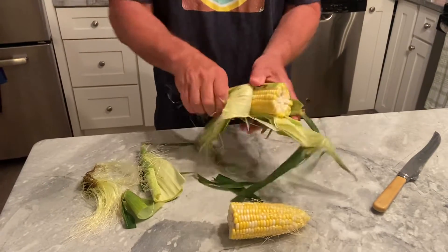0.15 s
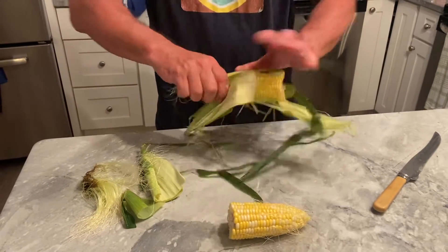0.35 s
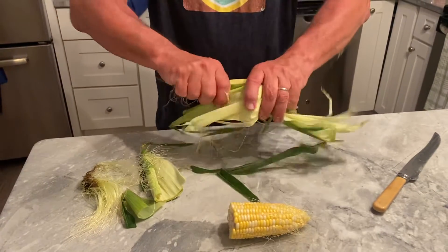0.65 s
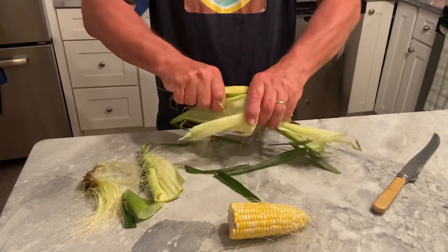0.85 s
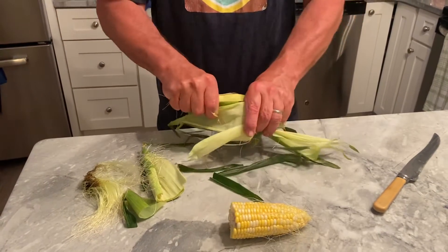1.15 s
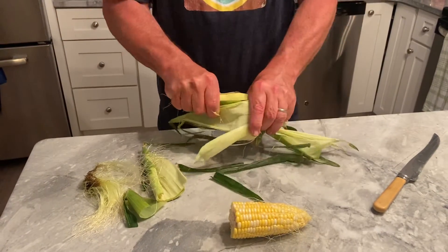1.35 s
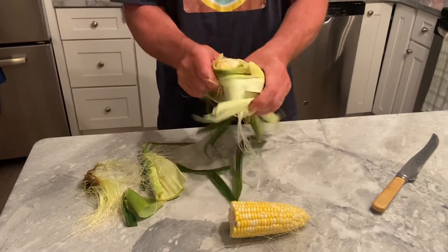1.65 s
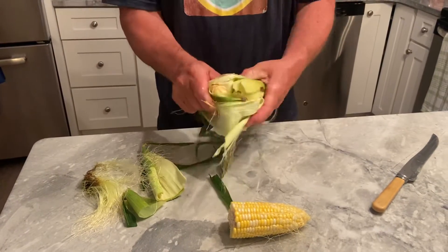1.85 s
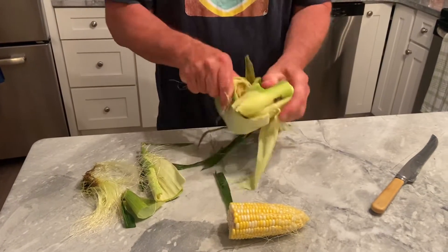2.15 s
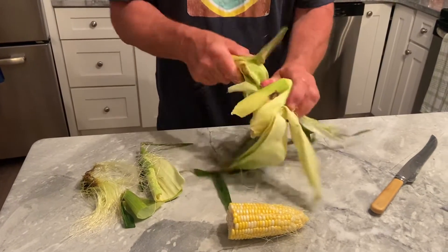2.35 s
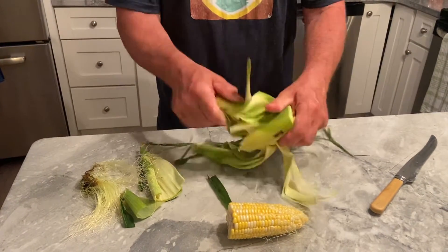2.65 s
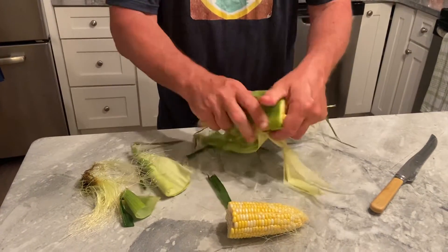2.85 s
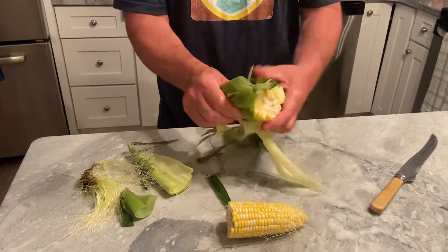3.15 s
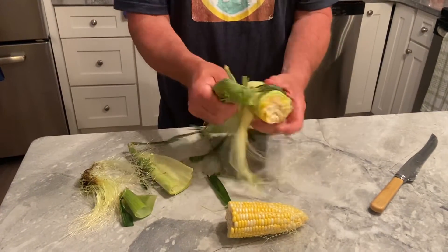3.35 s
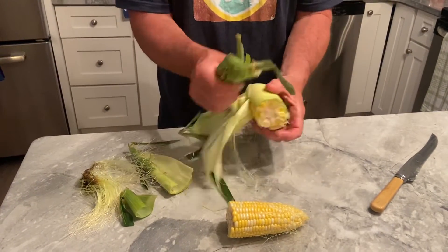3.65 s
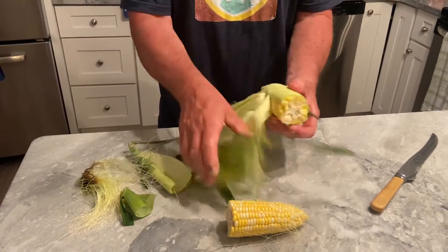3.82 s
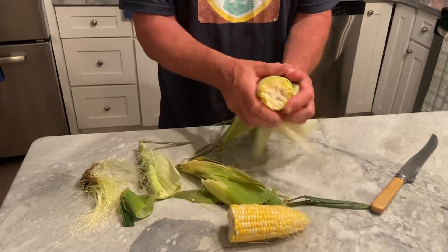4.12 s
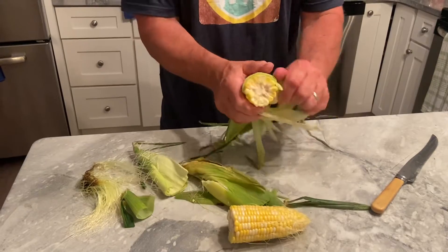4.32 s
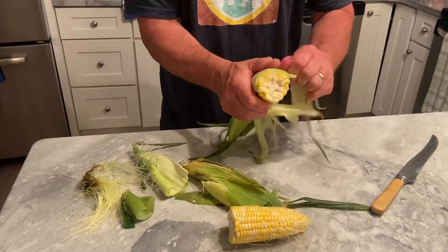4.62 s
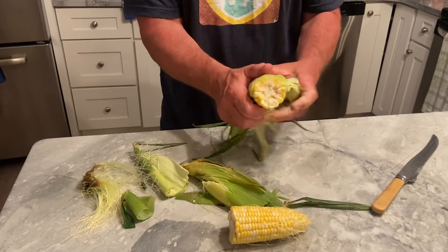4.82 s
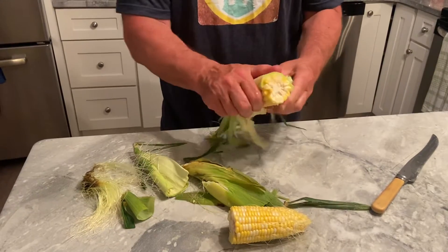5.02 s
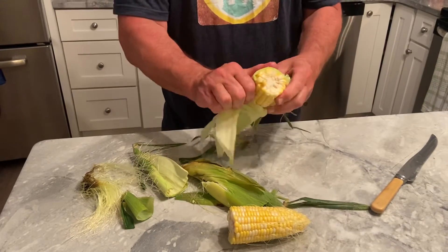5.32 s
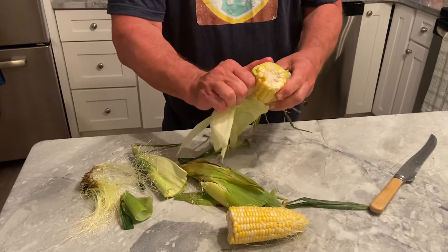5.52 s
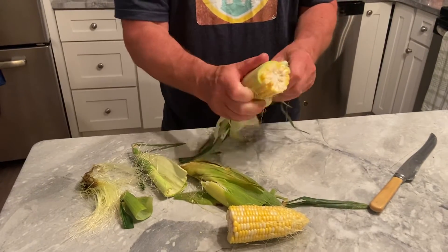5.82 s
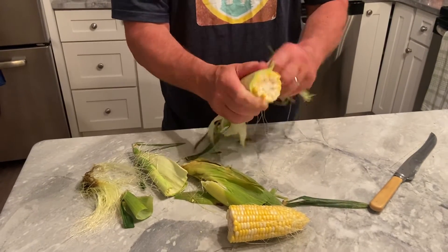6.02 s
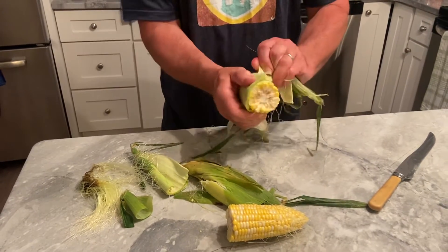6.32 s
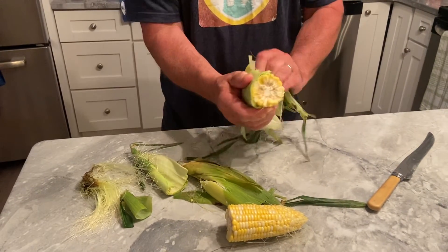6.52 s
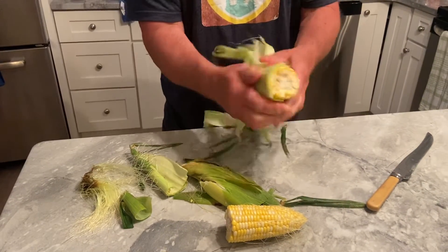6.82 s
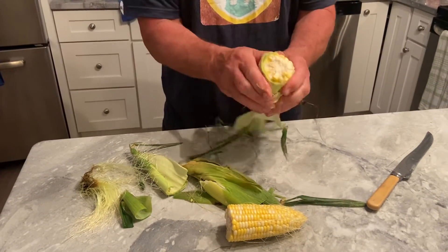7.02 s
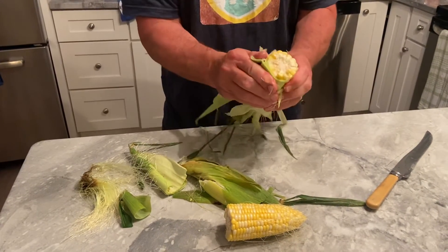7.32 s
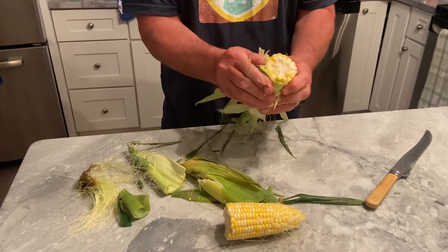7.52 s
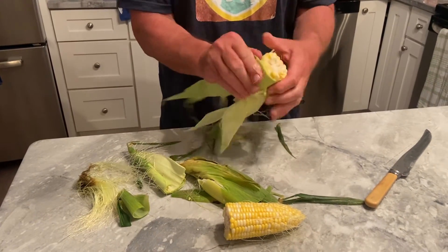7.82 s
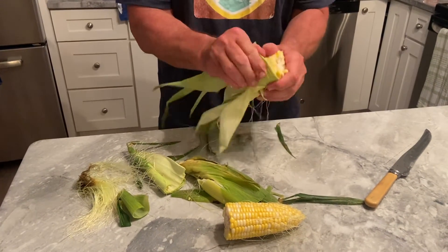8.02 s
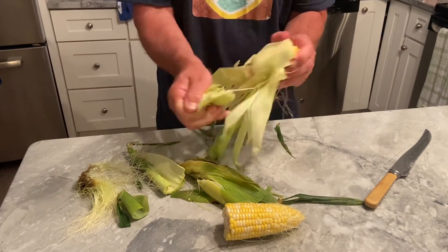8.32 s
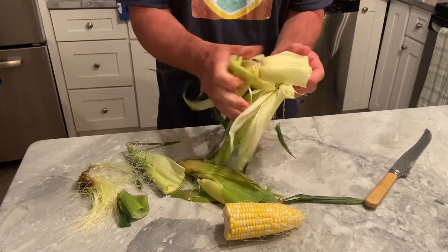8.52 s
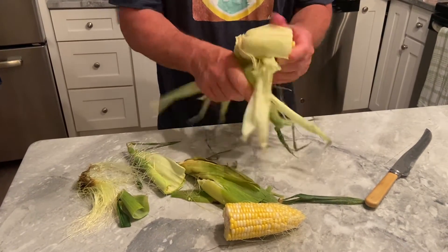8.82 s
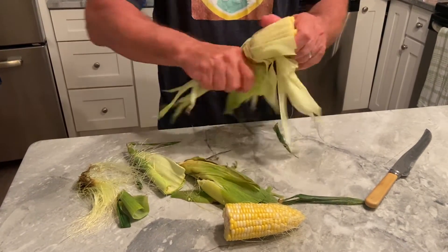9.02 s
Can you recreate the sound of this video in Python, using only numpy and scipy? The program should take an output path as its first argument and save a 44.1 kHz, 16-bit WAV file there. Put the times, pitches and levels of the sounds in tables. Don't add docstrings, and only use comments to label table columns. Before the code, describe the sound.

Close hands peel damp corn leaves: soft papery rubbing, sharp fibrous cracks, brief wet squeaks and small thuds over a faint refrigerator hum.

```python
import sys
import numpy as np
from scipy import signal
from scipy.fft import rfft, irfft, next_fast_len
from scipy.io import wavfile
from scipy.ndimage import uniform_filter1d

SR = 44100
rng = np.random.default_rng(int(sys.argv[2]) if len(sys.argv) > 2 else 0)


def file_out(sig):
    cols = np.atleast_2d(sig).T
    lim = np.clip(cols, -1, 1)
    pcm = np.round(lim * 32767).astype(np.int16)
    wavfile.write(sys.argv[1], SR, pcm)


def volts(x):
    e = np.asarray(x, float) / 20
    return 10 ** e


N = 403956


def evened(x):
    return x / np.sqrt(np.mean(x ** 2) + 1e-20)


def read(points, hz):
    f, value = np.transpose(points)
    return np.interp(np.log(hz + 1), np.log(f + 1), value)


def add(mix, start_s, sound):
    part = mix[round(start_s * SR):][:len(sound)]
    part += sound[:len(part)]


def resonate(x, hz, width_hz):
    turn = np.exp(2j * np.pi * hz * np.arange(len(x)) / SR)
    r = np.exp(-np.pi * width_hz / SR)
    return 2 * (turn * signal.lfilter([1 - r], [1, -r], x / turn)).real


def causal(x, db):
    log_gain = np.log(volts(np.maximum(db, -100)))
    whole = np.concatenate([log_gain, log_gain[-2:0:-1]])
    min_phase = np.exp(np.conj(signal.hilbert(whole))[:len(db)])
    return irfft(rfft(x) * min_phase, len(x))


# frequency in Hz, level in dB per Hz.
HUM_SPECTRUM = [(18, -38), (50, 2), (98, -12), (204, -3.5), (486, -13), (780, -21), (1250, -25.5),
                (2010, -35), (6400, -32.5), (11000, -38.5), (16000, -60)]
# frequency in Hz, correlation.
HUM_LIKENESS = [(60, 0.96), (130, 0.93), (290, 0.62), (640, 0.35), (1410, 0.077), (3100, 0.6), (6820, 0.23),
                (15000, 0.53)]
# frequency in Hz, width in Hz, level in dB.
MOTOR_LINES = [(145.5, 10, -54.5), (199, 14, -55.5), (294.3, 14, -61)]


def hum():
    air_db = -49
    frames, hz = N // 512 + 5, np.fft.rfftfreq(2048, 1 / SR)
    a, b, c, d = rng.standard_normal((frames, 1025, 4)).T
    same = np.clip(read(HUM_LIKENESS, hz), -1, 1)[:, None]
    left = a + 1j * b
    right = same * left + np.sqrt(1 - same ** 2) * (c + 1j * d)
    z = np.array([left, right]) * volts(read(HUM_SPECTRUM, hz))[:, None]
    air = evened(signal.istft(z, nperseg=2048, noverlap=1536)[1][:, :N])

    motor = np.zeros(N)
    for line_hz, width_hz, db in MOTOR_LINES:
        waver = evened(resonate(rng.standard_normal(N), line_hz, width_hz))
        tone = np.sin(2 * np.pi * line_hz * np.arange(N) / SR)
        motor += volts(db) * evened(waver + 1.5 * tone)
    return volts(air_db) * air + motor


def strokes(rows, swell_db):
    still_db = -80
    start, peak, end, db, sink_s, tilt = np.transpose(rows)[:, :, None]
    t = np.arange(0, N / SR + .002, .001)
    swell = swell_db * (t - peak) / np.maximum(peak - start, 1e-4)
    sink = 20 * (peak - t) / sink_s
    level_db = np.maximum(db + np.where(t < peak, swell, sink), still_db)
    each_db = np.where((t >= start) & (t <= end), level_db, still_db)
    return t, each_db.max(0), tilt[each_db.argmax(0), 0]


# frequency in Hz, level in dB.
LEAF_SPECTRUM = [(150, -55.5), (400, -6.5), (900, -6.5), (2000, -0.5), (4200, -1.3), (7000, -6.8),
                 (10000, -8), (13000, -17.5), (16000, -37)]


def crackle(s, level_db, tilt, per_s, spread_db, hiss, clump_db, body_db):
    sheet_hz, sheet_width_hz = 2700, 1100
    clumps = evened(uniform_filter1d(uniform_filter1d(rng.standard_normal(N), 500), 300))
    tick_level = volts(spread_db * np.minimum(rng.exponential(1, N), 6))
    ticks = tick_level * (rng.random(N) < per_s / SR)
    grains = evened(signal.lfilter([1], [1, -.9], ticks) * rng.standard_normal(N))
    drive = (grains + hiss * rng.standard_normal(N)) * volts(clump_db * clumps)

    hz, t, z = signal.stft(drive, SR, nperseg=256, noverlap=192)
    hz = hz[:, None]
    patches = rng.standard_normal(z.shape[::-1]).T
    patches = evened(uniform_filter1d(uniform_filter1d(patches, 5, 0), 9, 1))
    slope_db = np.log2(np.maximum(hz, 1100) / 3000) * np.interp(t, s, tilt)
    sheet_db = body_db / (1 + ((hz - sheet_hz) / sheet_width_hz) ** 2)
    z = z * volts(read(LEAF_SPECTRUM, hz) + slope_db + sheet_db + 2.8 * patches)
    leaves = evened(signal.istft(z, SR, nperseg=256, noverlap=192)[1][:N])
    return leaves * volts(np.interp(np.arange(N) / SR, s, level_db) - 2.5)


# start in seconds, level in dB,
# time to sink 20 dB in seconds, brightness in dB per octave.
GRIP_SHIFTS = [(0.0, -47, .45, -0.6), (.458, -45.5, .17, -1), (.57, -46, .13, 1), (.68, -54, .5, -2),
               (1.312, -60, .8, 0.5), (1.49, -32.5, .22, -2.5), (1.62, -46.5, .35, 3),
               (1.758, -42, .14, -4), (2.26, -35, .23, -1.5), (2.4, -48.5, .6, 0.6), (2.686, -45, .22, -1),
               (3.352, -38, .175, 0.3), (3.712, -45, .2, -1), (4.056, -50, .4, -1), (4.64, -48, .9, 0.7),
               (5.198, -50, .095, -3), (5.612, -59, .5, 4), (6.52, -52, .6, 2), (6.87, -54, .7, 1),
               (7.212, -54, .2, 5), (7.598, -52, .15, 5), (7.75, -61, .4, 2), (7.93, -62, .6, -1),
               (8.05, -53, .05, 1), (8.335, -37, .2, 0.3), (9.0, -55, 1.5, 2.5)]
# start in seconds, peak in seconds, level in dB,
# time to sink 20 dB in seconds, brightness in dB per octave.
LEAF_SLIDES = [(.24, .298, -46.5, .1, 3), (.9, 1.174, -50, .14, 3), (1.94, 1.99, -55, .1, 2.5),
               (2.11, 2.164, -44, .25, 2), (2.72, 3.014, -44.5, .16, 1), (3.264, 3.278, -42, .06, -4),
               (3.5, 3.66, -51.5, .02, 0.1), (3.72, 3.78, -43.5, .3, 3.5), (3.84, 3.922, -45, .09, -2),
               (4.06, 4.13, -46.5, .6, -1.5), (4.8, 5.008, -50, .33, -1), (5.29, 5.33, -50, .2, 2),
               (5.72, 5.745, -49.5, .09, 3), (5.78, 5.87, -51, .09, 0.6), (5.97, 6.1, -48, .06, 0.3),
               (6.66, 6.706, -49.5, .08, 1), (6.9, 7.152, -57.5, .11, 3), (7.21, 7.296, -55, .12, -1),
               (8.55, 8.662, -42, .24, 0.4), (8.875, 8.942, -43.5, .08, 0.3)]


def rustle():
    shift_s = .008
    rows = [(s - shift_s, s, np.inf, *rest) for s, *rest in GRIP_SHIFTS]
    rows += [(start, peak, np.inf, *rest) for start, peak, *rest in LEAF_SLIDES]
    return crackle(*strokes(rows, swell_db=11),
                   per_s=2800, spread_db=3.0, hiss=0.7, clump_db=1.6, body_db=-0.8)


# time in seconds, peak in dB, ring in Hz, brightness in dB per octave.
STRONG_FIBRES = [(1.1568, -28.5, 4340, 0.5), (1.4141, -.3, 4300, 0.4), (1.4165, -5, 1500, -2),
                 (1.4215, -11, 1400, -1), (1.4258, -9, 2200, -2), (1.4294, -10, 4300, 0.1),
                 (1.444, -14, 2100, -1), (1.4498, -11, 1400, -1), (1.46, -14, 2900, -1),
                 (1.467, -17, 3500, -1), (1.478, -16, 2000, -2), (2.0021, -23, 3600, -1),
                 (2.003, -28, 1800, -3), (2.0084, -26, 3400, 2), (2.0462, -22, 2000, 0.1),
                 (2.155, -22.5, 4300, 3), (2.26, -26, 5300, 4), (2.2838, -17, 1110, -4.5),
                 (2.3059, -20, 1700, -0.3), (2.3156, -17.5, 3930, 3), (2.327, -21.5, 3630, 5),
                 (3.27, -11.5, 4300, 1.5), (3.3519, -10.5, 2300, 3), (4.3469, -13.5, 2600, -0.3),
                 (4.6447, -18.5, 2200, 2), (6.1785, -26, 3500, -1), (6.4074, -25, 4070, 0.1),
                 (6.4415, -24, 2120, 1), (6.4645, -24, 6500, 4), (8.104, -16.5, 3500, -2),
                 (8.1384, -17, 3840, 0.5), (8.1643, -14.5, 3300, -1), (8.1849, -22, 3800, -1.5),
                 (8.229, -14, 4000, -1), (8.2364, -16, 3100, -1), (8.2434, -15.5, 3500, -1.5),
                 (8.2584, -20, 3530, -1), (8.2769, -16, 2060, -2), (8.2908, -9, 3000, -2),
                 (8.2946, -10, 2300, 1.5), (8.3043, -11, 3600, 1), (8.3115, -15, 2500, 0.1),
                 (8.321, -16, 2200, -2), (8.328, -17, 3000, -1), (9.0833, -21, 5120, 1),
                 (9.1404, -19, 4500, -2.2)]
# time in seconds, peak in dB, ring in Hz, brightness in dB per octave.
THIN_STRANDS = [(.2569, -39, 6000, 3), (.268, -41, 3000, 1), (.292, -38, 6800, 4), (.3712, -45, 7200, 4),
                (.47, -41, 2200, 1), (.644, -44, 9000, 4), (.68, -43, 2500, 0.1), (1.6642, -39, 6500, 4),
                (3.1059, -43, 6000, 3), (3.7629, -40, 6000, 3), (4.2647, -33, 3000, -1),
                (4.3017, -34, 2200, 0.5), (4.49, -35, 6500, 3), (5.7375, -43, 5500, 3),
                (5.798, -39, 4000, -0.5), (5.83, -46, 3700, 0.5), (5.853, -44, 3700, -1),
                (5.863, -37, 1300, -2), (5.906, -47, 7500, 5), (6.2945, -25, 7000, 4),
                (6.298, -29, 6500, 2), (6.821, -48, 6000, 3), (7.119, -47, 10500, 4), (7.155, -48, 5000, 2),
                (7.2147, -42, 5500, 1.5), (7.232, -46, 4000, 0.5), (7.2824, -43, 4700, 1),
                (7.5389, -49, 6000, 3), (7.5985, -38, 4500, 4), (7.6232, -39, 4500, 4),
                (8.114, -28, 2500, 0.5), (8.641, -32, 4000, 2), (8.917, -32, 1900, -1),
                (8.946, -27, 4800, 0.5), (9.0148, -27, 3000, -2), (9.039, -33, 7000, 4),
                (9.073, -38, 4000, 1)]
# time in seconds, peak in dB.
RIB_BREAKS = [(1.7546, -33), (1.7599, -27.5), (1.7716, -26.5), (1.7955, -37), (1.8, -33), (1.805, -31),
              (1.8132, -31), (1.819, -29.5), (1.837, -37), (1.8435, -36), (2.9118, -34), (3.5796, -42),
              (3.905, -35), (3.9659, -38.5), (4.9782, -35.5), (5.0592, -38.5), (6.269, -39), (6.285, -36),
              (7.7406, -46), (7.9287, -44), (8.0576, -40)]
# time in seconds, peak in dB.
VEIN_BREAKS = [(.6652, -37.5), (.7626, -40), (.9457, -39), (1.0141, -34), (1.072, -33), (1.0869, -35),
               (1.313, -36), (1.3289, -34.5), (2.3435, -24.5), (2.5818, -34.5), (3.1774, -27),
               (3.7045, -41.5), (5.0094, -36), (5.3102, -42.5), (5.6082, -41), (5.981, -40), (6.0805, -33),
               (6.102, -35), (6.424, -32), (6.452, -33), (6.9965, -42.5), (9.0334, -29)]
# time in seconds, peak in dB.
BLADE_BREAKS = [(.572, -36), (.737, -42), (2.6888, -34.5), (2.9786, -37), (3.4038, -25.5), (4.3536, -26),
                (4.58, -33), (5.197, -39.5), (5.363, -42.5), (6.2165, -34), (6.309, -30), (6.321, -34),
                (6.349, -31), (6.389, -33), (6.399, -29), (6.432, -32), (6.461, -29), (8.152, -26),
                (9.0504, -27), (8.6795, -30.5)]
# time in seconds, peak in dB.
TIP_BREAKS = [(.973, -43), (2.1291, -28.5), (2.5553, -34), (3.149, -27), (3.1604, -27.5), (3.1682, -21),
              (4.063, -34), (4.4115, -30.5), (4.4525, -22), (4.6154, -36), (4.7241, -35.5), (4.822, -38.5),
              (6.1663, -29.5), (6.172, -32), (6.2366, -28.5), (6.227, -33), (8.6553, -32.5),
              (9.0947, -18.5), (9.1043, -19.5), (9.121, -19), (9.1284, -14)]
# ring in Hz, brightness in dB per octave.
LEAF_PARTS = [
    (1350, -5.5),
    (2150, 2.5),
    (4000, 2.5),
    (6200, 6.5),
]


def breaks():
    faint_db, fray_db = -33.2, -2.5
    small = []
    for rows, (ring_hz, tilt) in zip((RIB_BREAKS, VEIN_BREAKS, BLADE_BREAKS, TIP_BREAKS), LEAF_PARTS):
        for s, db in rows:
            small.append((s, db + (db < faint_db) * fray_db, ring_hz, tilt))
    return STRONG_FIBRES + THIN_STRANDS + small


def snaps():
    hold_s, rise_s = .0015, .0006
    out, t, hz = np.zeros(N), np.arange(2048) / SR, np.fft.rfftfreq(2048, 1 / SR)
    for s, db, ring_hz, tilt in breaks():
        soft = np.clip((-18 - db) / 20, 0, 1)
        t60_s = .008 + .017 * soft
        fade = volts(-60 * np.maximum(t - hold_s, 0) / t60_s) * np.minimum(t / rise_s, 1)
        burst = rfft(rng.standard_normal(2048) * fade)
        burst = irfft(burst / abs(burst) ** .45) * np.sqrt(fade)
        ring_db = (6.3 + 4 * soft) / (1 + ((hz - ring_hz) / (.25 * ring_hz)) ** 2)
        slope_db = tilt * np.log2(np.maximum(hz, 1100) / 3000)
        thin_db = 1.2 * np.log2(np.clip(hz / 1200, .01, 1))
        crack = causal(burst, read(LEAF_SPECTRUM, hz) + slope_db + ring_db + thin_db)
        add(out, s, volts(db + 2.1) * crack / np.abs(crack).max())
    return out


# start in seconds, peak in seconds, end in seconds,
# level in dB, brightness in dB per octave.
HUSK_TEARS = [(1.4115, 1.415, 1.419, -16, -1.5), (1.419, 1.428, 1.434, -15, -0.6),
              (1.428, 1.435, 1.495, -19.5, -1), (2.004, 2.03, 2.085, -30.5, 0.8),
              (2.275, 2.283, 2.37, -26, -1), (3.09, 3.172, 3.19, -38, -1), (4.2, 4.354, 4.36, -37, 0.6),
              (4.446, 4.45, 4.56, -42, 3.5), (6.168, 6.17, 6.212, -42, 1.8), (6.215, 6.238, 6.25, -38, 4),
              (6.245, 6.25, 6.6, -42, 1), (6.37, 6.468, 6.52, -33.5, 1.5),
              (8.104, 8.106, 8.123, -27.5, 0.1), (8.125, 8.135, 8.228, -32.5, 1),
              (8.228, 8.232, 8.29, -26.5, -0.3), (8.265, 8.307, 8.318, -21, -0.3),
              (8.312, 8.32, 8.36, -25.5, -1), (9.018, 9.02, 9.07, -42, -2), (9.08, 9.126, 9.19, -28.5, 2.5)]


def tears():
    rip_in_db, rip_out_db = 12, 11
    rows = []
    for start, peak, end, db, tilt in HUSK_TEARS:
        sink_s = 20 * max(end - peak, 1e-3) / rip_out_db
        rows.append((start, peak, end, db, sink_s, tilt))
    return crackle(*strokes(rows, rip_in_db),
                   per_s=3000, spread_db=3.0, hiss=.4, clump_db=2.2, body_db=1.2)


# time in seconds, peak in dB, pitch in Hz, t60 in seconds.
BLOWS = [(1.4136, -6.5, 550, 0.028), (1.4155, -17, 270, 0.06), (1.4155, -16, 190, .045),
         (1.417, -29, 130, .06), (1.428, -26, 600, .06), (1.447, -24, 340, .06), (2.847, -33, 560, 0.11),
         (2.85, -38, 850, .12), (2.849, -39, 1500, .07), (4.348, -39, 800, .05), (4.455, -40, 700, .04),
         (6.41, -39, 900, .12), (6.44, -38, 800, .06), (7.213, -48, 1000, .15), (8.23, -32, 1100, .04),
         (3.868, -33, 113, 0.15), (3.905, -33.5, 127, 0.19), (3.271, -30, 650, .035),
         (3.353, -32, 650, .05), (3.408, -38, 450, .04), (3.58, -45, 620, .06), (3.92, -44, 600, .15),
         (6.397, -37, 680, 0.045), (6.93, -48.5, 62, 0.21), (7.3, -44, 82, .3), (8.141, -33, 280, .15),
         (8.15, -34.5, 150, .1), (8.104, -27, 800, .04), (8.165, -34, 450, .05), (8.186, -30, 550, .04),
         (8.296, -31, 600, .05), (9.141, -30, 600, .04), (8.275, -33, 300, 0.1)]


def thuds():
    out, t = np.zeros(N), np.arange(16384) / SR
    for s, db, hz, t60_s in BLOWS:
        puff = resonate(rng.standard_normal(len(t)), 1.2 * hz, 1.2 * hz)
        puff = evened(resonate(puff, 1.4 * hz, 2.8 * hz))
        puff_gain = np.clip(hz / 700, .4, .9) * np.minimum(t60_s / .045, 1)
        body = np.sin(2 * np.pi * hz * t) + puff_gain * puff
        blow = volts(db - .8 - 60 * t / t60_s) * body * np.minimum(t * hz * 3.4, 1)
        high_pass = signal.butter(2, .4 * hz, 'high', fs=SR)
        add(out, s, signal.lfilter(*high_pass, blow))
    return out


# start in seconds, length in seconds,
# slip rate in Hz, ring in Hz, level in dB.
WET_SLIPS = [(2.002, 0.01, 1650, 3300, -27), (2.012, .007, 1200, 3200, -32),
             (2.022, 0.007, 1900, 1900, -30), (2.026, 0.01, 1550, 1550, -28),
             (2.034, .008, 2000, 2000, -30), (2.033, .008, 1100, 1100, -36), (2.045, .007, 2000, 2000, -33),
             (2.047, .016, 800, 3000, -34), (2.051, .012, 800, 1600, -36), (2.07, .007, 900, 3900, -39),
             (2.165, .019, 1050, 1050, -38), (2.162, .008, 1000, 2000, -38),
             (2.173, .011, 1030, 2060, -37.5), (2.058, .02, 960, 1920, -39), (2.074, .022, 770, 1540, -40),
             (2.102, .007, 1000, 2000, -40), (2.174, .01, 1070, 4200, -43), (2.275, 0.02, 900, 1210, -36),
             (4.302, 0.014, 450, 2000, -39), (4.32, 0.014, 450, 1900, -42), (8.059, 0.0093, 800, 1400, -58),
             (8.712, 0.02, 1250, 1300, -52), (8.934, 0.005, 600, 1800, -40), (8.942, .01, 500, 2100, -44),
             (9.021, .006, 700, 2100, -44), (9.032, .013, 500, 1900, -41), (1.42, .01, 700, 2100, -19),
             (1.436, .016, 650, 2050, -26), (1.457, .008, 800, 1650, -24), (1.51, .02, 600, 1950, -32),
             (1.538, .016, 600, 1900, -34), (1.55, .012, 600, 1450, -36), (1.57, .016, 600, 2050, -37),
             (1.61, .02, 500, 1450, -40), (9.117, .014, 700, 1500, -36)]


def squeaks():
    out = np.zeros(N)
    for s, length_s, rate_hz, ring_hz, db in WET_SLIPS:
        t = np.arange(0, length_s, 1 / SR)
        wobble = evened(uniform_filter1d(rng.standard_normal(4096), 60))[:len(t)]
        turns = np.cumsum(rate_hz * (1.03 - 0.073 * t / length_s + .09 * wobble)) / SR
        slips = np.diff(np.floor(turns), prepend=0) * np.sin(np.pi * t / length_s) ** 0.5
        slips = np.pad(slips, (0, 400))
        leaf = resonate(resonate(slips, ring_hz, 700), ring_hz, 900)
        leaf += .3 * resonate(slips, 1.95 * ring_hz, 900)
        leaf = resonate(leaf, 1.15 * ring_hz, 1.6 * ring_hz)
        add(out, s, volts(db - 2.5) * evened(leaf))
    return out


# frequency in Hz, t60 in seconds.
ROOM_T60 = [(200, 0.34), (530, 0.51), (1390, 0.54), (3680, 0.54), (9700, 0.32)]
# delay in seconds, level in dB.
EARLY_ECHOES = [(.0023, -11.5), (.0046, -15), (.0075, -11.5), (0.0117, -13.5), (.014, -11), (.021, -19)]


def kitchen(x):
    tail_db = -7.3
    size, out = SR * 3 // 4, np.zeros((2, N))
    for k in range(3):
        taps = np.zeros((2, size))
        at = np.arange(300, size - 20, 20) + rng.integers(0, 20, (2, (size - 301) // 20))
        np.put_along_axis(taps, at, rng.choice([-1., 1.], at.shape), 1)
        hz, t, z = signal.stft(taps, SR, nperseg=256)
        decay = volts(-60 * t / read(ROOM_T60, hz)[:, None])
        tail = signal.istft(z * decay, SR, nperseg=256)[1]
        tail[1] = 0.35 * tail[0] + 1.1 * tail[1]
        tail = volts(tail_db) * tail / np.linalg.norm(tail[0])
        for (s, db), shift in zip(EARLY_ECHOES, rng.uniform(.9, 1.1, (len(EARLY_ECHOES), 2))):
            delay = (s * shift[0] * SR + [0, 5 * shift[1]]).astype(int)
            tail[[0, 1], delay] += volts(db)
        turn = np.sqrt(2 / 3) * np.cos(np.pi * (np.arange(N) / SR * 7.3 + k / 3))
        out += signal.fftconvolve((x * abs(turn))[None], tail, axes=1)[:, :N]
        out += x * turn ** 2 * volts([[.7], [-.7]])
    return out


def scene():
    return kitchen(rustle() + snaps() + tears() + thuds() + squeaks()) + hum()


def roll_off(x):
    return signal.sosfilt(signal.butter(12, 16640, fs=SR, output="sos"), x)


def record(dry):
    size = next_fast_len(N)
    hz, (left, right) = np.fft.rfftfreq(size, 1 / SR), rfft(dry, size)
    shared = np.clip((hz - 4200) / 2600, 0, .99)
    lead = 2 * np.pi * np.maximum(hz - 6900, 0) / 4150
    skew = -.85 * np.exp(-(np.log((hz + 1) / 1600) / 0.85) ** 2)
    own = np.sqrt(1 - shared ** 2) * right * np.exp(1j * skew)
    right = own + shared * left * np.exp(1j * lead)
    passband = 1 / (1 + (42 / (hz + 1)) ** 6) / (1 + (hz / 15600) ** 30)
    ports = irfft(np.array([left, right * volts(-1.0)]) * passband, size)[:, :N]
    limited = .95 * np.tanh(ports / .95)
    return roll_off(limited)


dry = scene()
out = record(dry)
file_out(out)
```